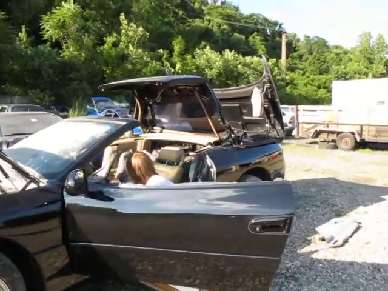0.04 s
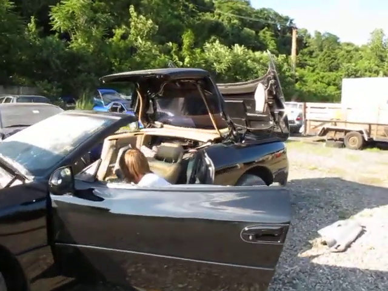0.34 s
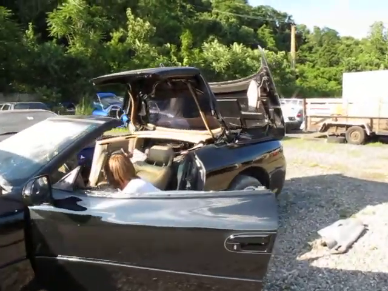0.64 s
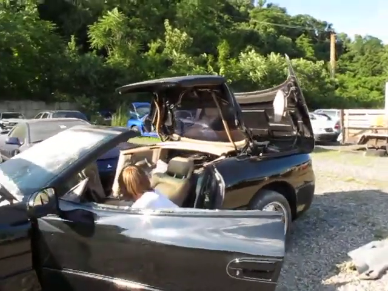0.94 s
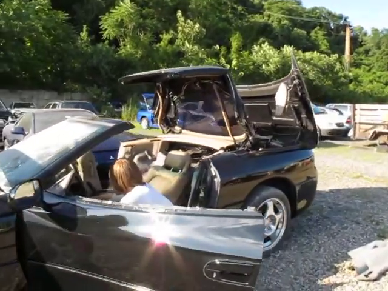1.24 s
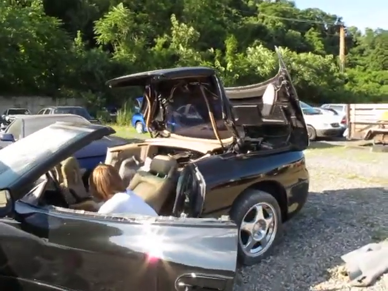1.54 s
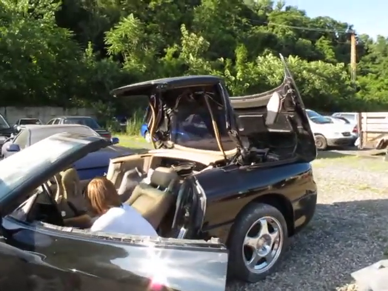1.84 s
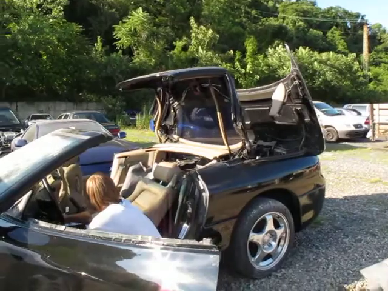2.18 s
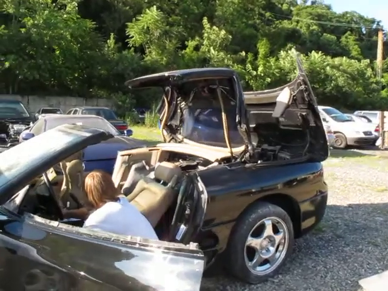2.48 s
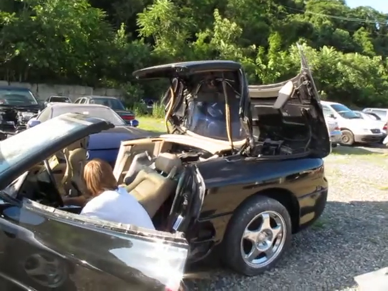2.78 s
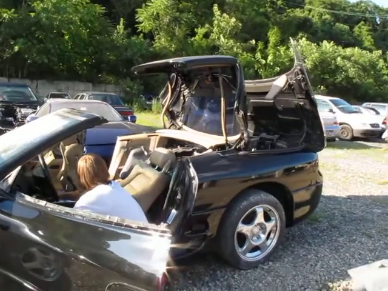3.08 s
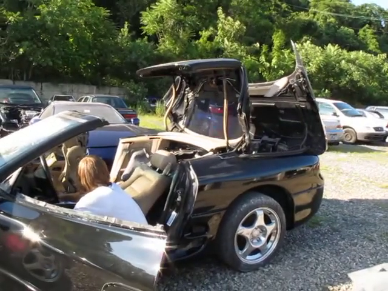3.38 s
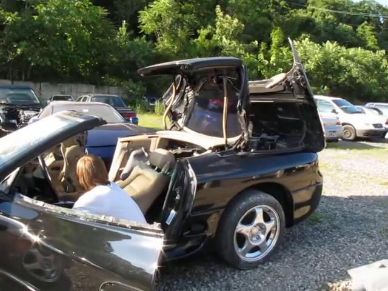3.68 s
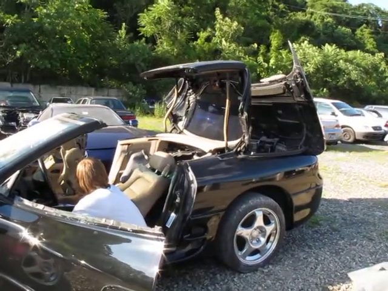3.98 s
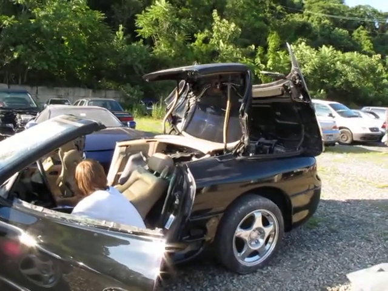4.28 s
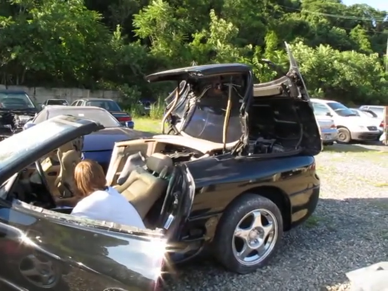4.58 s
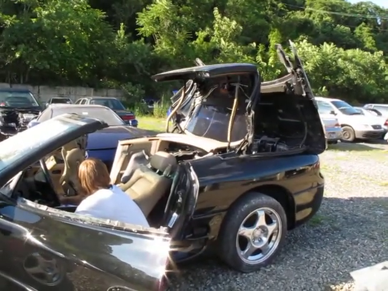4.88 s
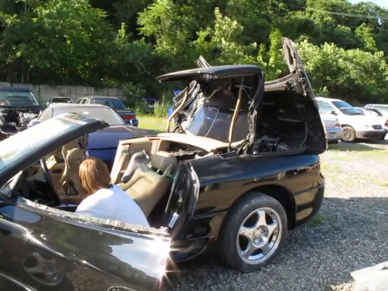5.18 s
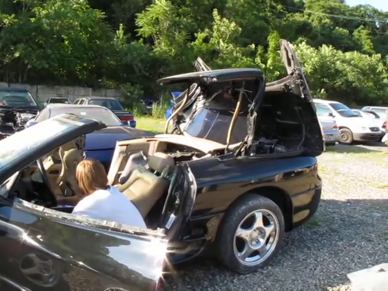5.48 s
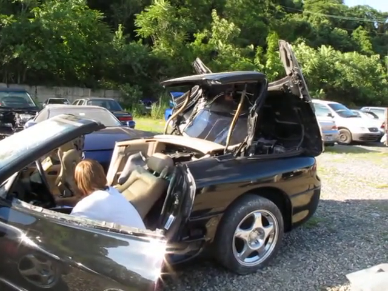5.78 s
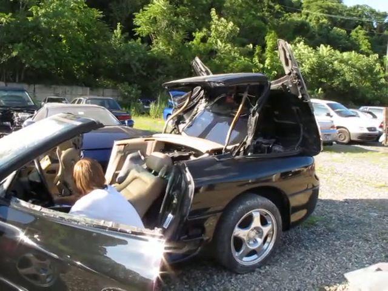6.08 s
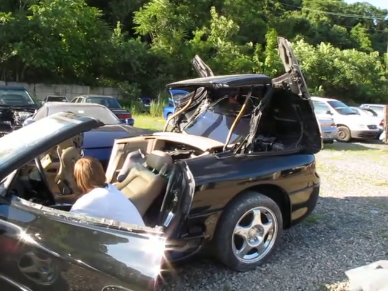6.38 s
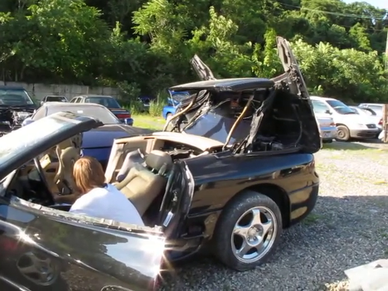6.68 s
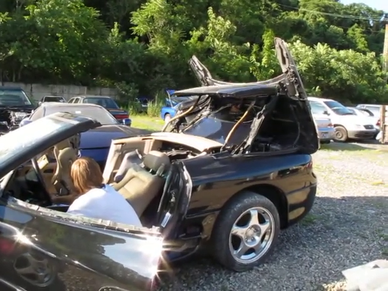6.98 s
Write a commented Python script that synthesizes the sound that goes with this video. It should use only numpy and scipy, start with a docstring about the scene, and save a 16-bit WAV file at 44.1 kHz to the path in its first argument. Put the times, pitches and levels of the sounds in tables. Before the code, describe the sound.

A convertible idles close by in an open lot for the whole seven seconds: a low, throbbing exhaust with light ticking and clatter from the engine and a thin, high belt hiss. The idle grows slightly louder as the hand-held microphone moves toward the rear. A soft scuff comes at the very start. Wind gusts rumble and thump on the microphone, strongest around 1.3 and 2.3 seconds, and settle by 3 seconds. Throughout, the folding roof's motor gives a faint, slightly wavering whine that swells under load near 0.7, 2, 3 and 5.5 to 6 seconds, with a thin whistle rising briefly near 4.8. A dry hinge gives tiny creaks at about 3.2 and 3.7 seconds, the second with a faint knock. At 5 seconds the roof linkage drops into place with one rattling metal clunk. A few more short creaks follow between 5.6 and 6.1 seconds, and the idle carries on.

```python
"""First you hear a car's low, throbbing idle, with a puff of wind on the hand-held microphone.
It is a convertible on a gravel lot: the engine's firings throb in the exhaust, its injectors tick and
its belt hisses on the pulleys. Gusts thump for about three seconds as the microphone moves along the
car. The roof is folding: its motor whines, swelling as it takes load, a dry hinge creaks a few times,
and the linkage gives a faint knock, then one rattling clunk near five seconds."""
import sys
import numpy as np
from scipy import signal
from scipy.fft import rfft, irfft, next_fast_len
from scipy.io import wavfile
from scipy.ndimage import uniform_filter1d, map_coordinates

SR = 44100
rng = np.random.default_rng(int(sys.argv[2]) if len(sys.argv) > 2 else 0)


def store_pcm(level_fs):
    """Save levels as 16-bit WAV."""
    pcm = np.round(np.clip(level_fs, -1, 1) * 32767).astype(np.int16)
    wavfile.write(sys.argv[1], SR, np.atleast_2d(pcm).T)


N = 310464
TIME = np.arange(N) / SR


def amp(db):
    """Turn decibels into a number to multiply by."""
    return 10 ** (np.asarray(db) / 20)


def unit(x):
    """Scale a sound to an average strength (rms) of 1."""
    return x / np.sqrt(np.mean(x ** 2) + 1e-20)


def noise():
    """White noise: an even hiss."""
    return rng.standard_normal(N)


def curves(rows):
    """Join a table's points with straight lines: one curve for each column after the time."""
    times, *columns = np.transpose(rows)
    return [np.interp(TIME, times, column) for column in columns]


def wobble(rate):
    """A smooth curve through `rate` random points a second."""
    return map_coordinates(rng.standard_normal(int(N * rate / SR) + 4), [TIME * rate])


def swells(rows, rest_db):
    """A volume that rests at rest_db and rises in a hump for each row: t/s, level/dB, half-length/s."""
    humps = sum((amp(db) * np.exp(-.5 * ((TIME - s) / half) ** 2)) ** 2 for s, db, half in rows)
    return np.sqrt(amp(rest_db) ** 2 + humps)


def ticking(turns, count, sharpness):
    """Short, even pulses, `count` of them each turn."""
    return unit(np.exp(sharpness * np.cos(2 * np.pi * count * turns)))


def filtered(x, response):
    """Turn each frequency in x up or down by response(hz)."""
    size = next_fast_len(N + 8192)
    return irfft(rfft(x, size) * response(np.fft.rfftfreq(size, 1 / SR)), size)[:N]


def coloured(x, spectrum, modes=()):
    """Give x a broad tone colour plus any ringing peaks, at strength 1."""
    f, db = np.transpose(spectrum)

    def response(hz):
        peaks_db = sum(gain / (1 + (2 * (hz - centre) / width) ** 2) for centre, width, gain in modes)
        return amp(np.interp(np.log(hz + 1), np.log(f + 1), db) + peaks_db)
    return unit(filtered(x, response))


def ringing(x, hz, width):
    """Make x ring around one pitch, at strength 1."""
    return unit(filtered(x, lambda f: 1 / (1 + 2j * (f - hz) / width) / (1 + 1j * (f - hz) / width)))


def add(track, s, sound):
    """Mix a sound into the track at s seconds."""
    part = track[max(round(s * SR), 0):][:len(sound)]
    part += sound[:len(part)]


FIRING_HZ = 35.7
# The exhaust grows as the microphone nears the tail: t/s, level/dB
EXHAUST_LEVEL = [(0, -27), (1, -24), (2.8, -23.5), (4.1, -21.5), (7.04, -23)]
# Its low notes: multiple of the firing rate, relative level/dB
EXHAUST_NOTES = [(.5, -9.5), (1, -1), (1.5, -17.5), (2, -18.5), (3, -30.5)]
def exhaust(firings):
    """The silencer smooths the firings into a few low, uneven notes over a lumpy burble."""
    notes = sum(amp(db + 1.18 * wobble(14)) * np.cos(2 * np.pi * (multiple * firings + rng.random()))
                for multiple, db in EXHAUST_NOTES)
    burble_colour = [(8, 6.5), (19, -8), (26, 1), (45, 2), (62, -3), (90, -8), (160, -16.5), (400, -120)]
    burble = coloured(noise(), burble_colour)
    return amp(curves(EXHAUST_LEVEL)[0]) * (amp(-0.34) * unit(notes) + amp(-11) * burble)


# Tone colour of an injector's tick: f/Hz, relative level/dB
INJECTOR_COLOUR = [(4000, -28), (8000, -1.5), (11200, 0), (13000, -6.5), (15700, -19)]
def injectors(firings, level_db=-62.5, rise_s=.001, fade_s=.032, scatter_db=1.0):
    """The fuel injectors give one crisp tick for each firing."""
    since = firings % 1 / FIRING_HZ
    tick = (1 - np.exp(-since / rise_s)) * amp(scatter_db * wobble(36) - 60 * since / fade_s)
    return amp(level_db) * coloured(noise() * tick, INJECTOR_COLOUR)


# The microphone draws nearer: t/s, relative clatter level/dB, relative belt level/dB
BAY_LEVELS = [(0, -49.5, -48), (.45, -48.5, -46.5), (1, -45.7, -45), (2.2, -44, -44), (2.6, -47, -45.5),
              (3.7, -44.5, -43.5), (5.7, -44.5, -42), (7.04, -44.5, -43.5)]
# Tone colour of the engine block: f/Hz, relative level/dB
BLOCK_COLOUR = [(35, -49), (60, -4.5), (86, -4.5), (98, -3.5), (221, -4.5), (277, -10), (413, -7.5),
                (548, -11), (637, -14.5), (1170, -15.5), (1910, -17.5), (2260, -19.5), (2440, -21),
                (3120, -23.5), (5500, -28.5), (7150, -27.5), (12100, -120)]
# Pitches where the engine bay rings: f/Hz, width/Hz, boost/dB
BAY_RINGS = [(318, 52, 6.5), (663, 70, 6.5), (968, 47, 2.5), (1330, 210, 2.5), (1694, 39, 2.5),
             (2060, 79, 0), (2685, 36, 4.5), (2940, 49, 2.5), (3414, 55, 6.5), (3820, 160, 3.5)]
# Pulley tones: multiple of the belt's lap rate, early level/dB, late level/dB
PULLEY_TONES = [(30, -58, -54), (35, -52, -58), (40, -49.5, -48.5), (45, -61, -58), (50, -58, -59),
                (55, -67, -59), (61, -66, -56), (65, -56, -60), (69, -55, -54), (70, -57, -56),
                (75, -58, -58), (80, -65, -56), (160, -65, -63), (166, -59, -65), (180, -52, -62),
                (185, -68, -62), (230, -64, -64), (322, -68, -76), (363, -76, -69)]
def engine_bay(laps):
    """The engine block clatters, partly alike on every lap of the belt, and the pulleys sing."""
    pattern = rng.standard_normal(SR // 10)
    repeating = unit(map_coordinates(pattern, [laps % 1 * len(pattern)], mode="wrap"))
    ticks = 1 + 0.076 * ticking(laps, count=5, sharpness=2.9)
    clatter = coloured((.5 * repeating + noise()) * ticks, BLOCK_COLOUR, BAY_RINGS)
    late = np.clip((TIME - 2.3) / 0.92, 0, 1)  # the microphone moves to another side of the car
    lows = filtered(clatter, lambda hz: 1 / (1 + (hz / 900) ** 4))
    clatter -= 0.18 * (1 - late) * lows  # thinner from the front
    door_db = np.interp(TIME, [0, .7], [-6, 0])  # the open door screens the pulleys at first
    tones = np.zeros(N)
    for multiple, early_db, late_db in PULLEY_TONES:
        slip = (0.038 + 0.00049 * multiple) * wobble(14)  # belt slip blurs the high tones most
        tone_db = door_db + early_db + late * (late_db - early_db) + 2.3 * wobble(7)
        tones += amp(tone_db) * np.sin(2 * np.pi * (multiple * laps + slip))
    return amp(curves(BAY_LEVELS)[0] + 7.5) * clatter + tones


def tappets(laps, cover_hz=1925, width_hz=170, level_db=-57, growth=2.0):
    """Quick, even taps ring the valve cover; they stand out where the engine bay is loudest."""
    taps = noise() * ticking(laps, count=5, sharpness=3.2)
    bay_db = curves(BAY_LEVELS)[0]
    return amp(level_db + growth * (bay_db - bay_db.mean())) * ringing(taps, cover_hz, width_hz)


# How much the hiss swells on each lap: t/s, depth (0 to 1)
BELT_SWELL = [(0, .07), (2, .08), (4, .16), (5.6, .24), (7.04, .24)]
# Tone colours of the main hiss and a finer one: f/Hz, relative level/dB
HISS_COLOUR = [(3500, -39), (5200, -16.5), (6100, -5.5), (6600, -10), (7800, 0), (8900, -4.5), (9800, -8),
               (10400, -12), (11300, -36), (13000, -32), (15700, -45)]
FINE_COLOUR = [(4000, -45), (7000, 9.5), (9000, -2), (11200, -1), (13000, -13), (15700, -19)]
# Pitches where the metal rings: f/Hz, width/Hz, relative level/dB
METAL_RINGS = [(6053, 79, -18), (7730, 100, -10), (8460, 100, -12.5), (9000, 49, -17), (9320, 120, -16),
               (10160, 120, -19), (10540, 66, -21.5)]
def belt(laps):
    """The belt hisses on its pulleys, swelling once a lap, and its ticks ring the metal."""
    swell = 1 + curves(BELT_SWELL)[0] * np.cos(2 * np.pi * laps)
    worn = map_coordinates(rng.standard_normal(24), [laps % 1 * 24], mode="grid-wrap")
    rub = amp(worn + 1.9 * wobble(400))  # worn patches come round on every lap
    hiss = amp(-2.5) * coloured(noise() * rub, HISS_COLOUR)
    fine = amp(-9) * coloured(noise() * amp(1.9 * wobble(700)), FINE_COLOUR)
    ticks = 1 + 0.29 * ticking(laps, count=6, sharpness=1.8)
    rings = sum(amp(db + 1.9 * wobble(3.33)) * ringing(noise() * ticks, hz, width)
                for hz, width, db in METAL_RINGS)
    return amp(curves(BAY_LEVELS)[1] + 0.03) * (swell * (hiss + rings) + fine)


# Gusts: t/s, relative rumble level/dB, relative flutter level/dB, half-length/s
WIND_GUSTS = [(0.05, -28, -26.5, 0.017), (0.255, -27, -31, 0.06), (0.607, -29, -45, 0.067),
              (0.94, -19, -28, .06), (1.067, -21.5, -30, 0.037), (1.35, -16.5, -22.5, 0.042),
              (1.49, -19.5, -27.5, 0.075), (1.665, -18, -36, 0.032), (2.282, -17, -28, 0.04),
              (2.459, -18.5, -31, 0.061), (2.743, -22.5, -29, 0.051)]
# Tone colours of the wind's rumble, flutter and swirl: f/Hz, relative level/dB
RUMBLE_COLOUR = [(8, 3.5), (18, -4.5), (55, 2.5), (90, -6.5), (130, -27), (250, -29), (500, -120)]
FLUTTER_COLOUR = [(40, -47), (90, 2), (135, 0), (200, -6.5), (300, -19), (500, -45), (1000, -61),
                  (2000, -120)]
SWIRL_COLOUR = [(60, 3), (180, 3.5), (400, 2.5), (600, -11.5), (1000, -19), (2500, -43), (5000, -120)]
# Whirls of air hitting the microphone: t/s, peak level/dB, f/Hz
WIND_THUMPS = [(0.035, -13, 85), (0.049, -15.5, 149), (0.092, -20.5, 170), (1.016, -16, 108),
               (1.18, -16.5, 126), (1.323, -9.5, 106), (1.339, -17.5, 190), (1.358, -10, 139),
               (1.433, -20, 160), (1.473, -15.5, 75), (1.545, -11.5, 138), (2.273, -10, 75),
               (2.301, -3, 70.3)]
def wind():
    """Gusts shake the microphone; the strongest whirls of air land as single dull thumps."""
    rumble = swells([(s, db, half) for s, db, _, half in WIND_GUSTS], rest_db=-32)
    rumble *= coloured(noise(), RUMBLE_COLOUR)
    flutter = swells([(s, db, half) for s, _, db, half in WIND_GUSTS], rest_db=-43)
    flutter *= coloured(noise() * amp(3.7 * wobble(70)), FLUTTER_COLOUR)
    exposed = np.clip((3.1 - TIME) / 0.3, 0, 1)  # falls to calm beside the car
    out = amp(-0.5) * exposed * (rumble + flutter)
    swirl = coloured(noise(), SWIRL_COLOUR)
    for s, db, hz in WIND_THUMPS:
        passing = np.pi * hz * (TIME - s)
        out -= amp(db) * (1 - 2 * passing ** 2) * np.exp(-passing ** 2)  # suction as a whirl goes by
        swirl_db = -20 + 16 * np.log2(hz / 126)  # smaller, quicker whirls swirl more
        out += amp(db + swirl_db) * np.exp(-((TIME - s) / 0.013) ** 2) * swirl
    return out


# Tone colour of the scuff: f/Hz, relative level/dB
RUSTLE_COLOUR = [(1500, -3.5), (3500, -9), (5000, -3.5), (7000, -11), (11000, -20), (13500, -20),
                 (15700, -32)]
def rustle(at_s=.17, half_length_s=0.1, level_db=-45):
    """A short, soft scuff close by."""
    volume = amp(level_db) * np.exp(-((TIME - at_s) / half_length_s) ** 2)
    return volume * coloured(noise() * amp(1.9 * wobble(250)), RUSTLE_COLOUR)


def whine(hz, gain, blur, flutter_db=1.0):
    """One motor tone, blurred by the changing load."""
    turns = np.cumsum(hz * np.ones(N)) / SR + blur * wobble(45)
    return gain * unit(amp(flutter_db * wobble(14)) * np.sin(2 * np.pi * turns))


# Pitch of the roof pump: t/s, f/Hz
PUMP_NOTE = [(.3, 968), (.55, 982), (1, 988), (3, 975), (3.4, 962), (5.2, 979), (5.62, 997), (6.2, 935),
             (6.6, 990)]
# The pump sings out under load: t/s, level/dB, half-length/s
PUMP_SWELLS = [(.65, -53.5, 0.33), (2, -55, 0.15), (3.1, -53.5, .26), (4.35, -60, 0.15), (5.55, -50, 0.1),
               (5.95, -52, .25)]
# The motor's whistle swells: t/s, level/dB, half-length/s
WHISTLE_PEAKS = [(4.63, -53.5, .09), (4.82, -49.5, 0.068), (5.25, -56, .05)]
def roof_motor(whistle_hz=2508.5):
    """The pump's tone wanders with the load, under a thin whistle of steady pitch."""
    pump = whine(curves(PUMP_NOTE)[0], swells(PUMP_SWELLS, rest_db=-60), blur=0.079)
    whistle_gain = swells(WHISTLE_PEAKS, rest_db=-62 + 2.2 * wobble(3.98))
    return pump + whine(whistle_hz, whistle_gain, blur=0.024)


# Tone colour of clacking metal, in hinge and linkage: f/Hz, relative level/dB
CLACK_COLOUR = [(200, -8), (700, 4.5), (2500, 0.5), (5800, -4.5), (9000, -15), (15000, -35)]
# Creaks: t/s, relative level/dB, length/s
HINGE_CREAKS = [(3.181, -37, .015), (3.683, -34.5, .022), (5.605, -33.5, .015), (5.832, -24.5, .024),
                (6.015, -35, .022), (6.087, -28.5, .024)]
def hinge(slip_gap_s=.0092, ring_hz=4010, width_hz=560):
    """A dry hinge slips a few times in a quick row; each slip briefly rings the arm."""
    out, t = np.zeros(N), TIME[:SR // 16]
    ring = ringing(noise(), ring_hz, width_hz) + .8 * coloured(noise(), CLACK_COLOUR)
    for s, db, length in HINGE_CREAKS:
        for delay in np.arange(0, length, slip_gap_s):
            hz = ring_hz * (1 + .02 * rng.normal())
            ping = np.exp(-((t - .001) * 1200) ** 2) * np.sin(2 * np.pi * hz * t)
            tail = amp(-60 * t / 0.072) * np.roll(ring, rng.integers(N))[:len(t)]
            add(out, s + delay, amp(db) * (0.32 * ping + 0.23 * tail))
    return out


# Knocks: t/s, relative level/dB, extra level for the thud/dB
LINKAGE_KNOCKS = [(3.68, -45, 9), (4.955, -39.5, 10), (4.966, -41.5, 11), (4.978, -34, 4),
                  (5.007, -40.5, 10.5), (5.018, -28, -10), (5.028, -47, 6), (5.119, -51, 8)]
# The panel's notes: f/Hz, relative level/dB, time to fade by 60 dB/s
PANEL_NOTES = [(246, 2, 0.1), (320, -1.5, 0.089), (630, -4, 0.087), (806, -2.5, 0.094), (1890, -11, 0.059),
               (2760, -18, 0.068)]
def linkage():
    """A joint of the roof drops into place: the metal clacks and the panel thuds."""
    out, t = np.zeros(N), TIME[:SR // 4]
    rise = 1 - np.exp(-t / 0.0013)
    for s, db, thud_db in LINKAGE_KNOCKS:
        clack = coloured(noise(), CLACK_COLOUR)[:len(t)] * amp(-60 * t / 0.066)
        thud = sum(amp(level - 60 * t / fade_s) * np.sin(2 * np.pi * (hz * t + rng.random()))
                   for hz, level, fade_s in PANEL_NOTES)
        add(out, s, amp(db) * (clack + amp(thud_db) * thud) * rise)
    return out


# How fast the belt goes round: t/s, lap rate/Hz
BELT_SPEED = [(0, 10.2), (1, 10.28), (2.5, 10.35), (3.25, 10.39), (4.25, 10.45), (5.25, 10.49),
              (6.25, 10.48), (7.04, 10.5)]
def scene():
    """Mix the idling car, the wind and the folding roof into one channel."""
    laps = .27 + np.cumsum(curves(BELT_SPEED)[0]) / SR  # belt laps so far
    firings = FIRING_HZ * TIME + 0.026 * wobble(4.6)  # firings so far, a little uneven
    car = exhaust(firings) + injectors(firings) + engine_bay(laps) + tappets(laps) + belt(laps)
    roof = roof_motor() + linkage() + hinge()
    return (car + wind() + rustle() + roof)[None]


def record(dry, bass_hz=111, threshold_db=-22, max_dip_db=3.6, recover_db_per_s=2, top_hz=15730):
    """The camera turns down fast at loud thumps and comes back slowly; it keeps nothing above top_hz."""
    sensed = filtered(dry[0], lambda hz: 1 / (1 + (bass_hz / (hz + 1)) ** 4))  # it ignores deep bass
    level_db = 10 * np.log10(np.abs(uniform_filter1d(sensed ** 2, size=SR // 50)) + 1e-12)
    excess_db = np.clip(level_db - threshold_db, 0, max_dip_db)
    recovered_db = recover_db_per_s * TIME
    dip_db = np.maximum.accumulate(excess_db + recovered_db) - recovered_db
    dip_db = signal.lfilter([1 / 900], [1, 1 / 900 - 1], dip_db)  # smoothed over about 20 ms
    return filtered(dry[0] * amp(-dip_db), lambda hz: hz < top_hz)[None]


dry = scene()
out = record(dry)
store_pcm(out)
```